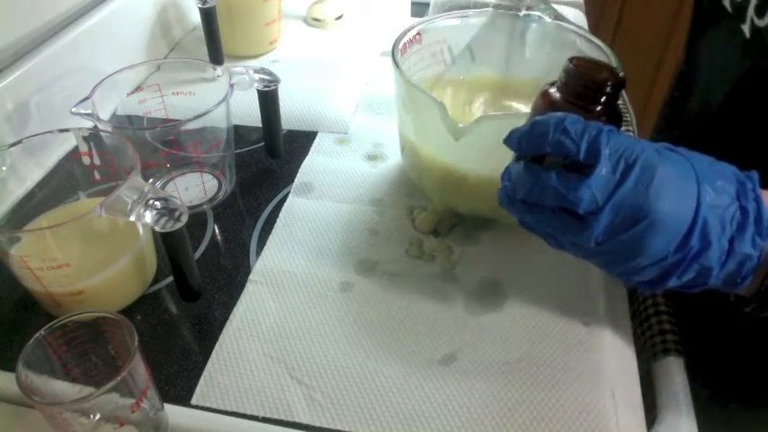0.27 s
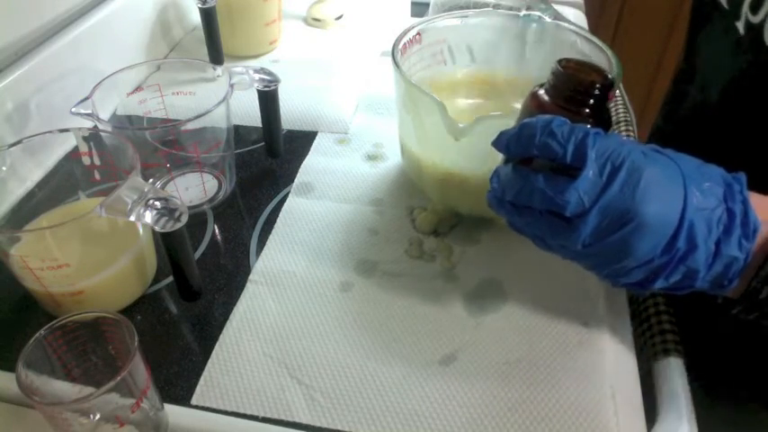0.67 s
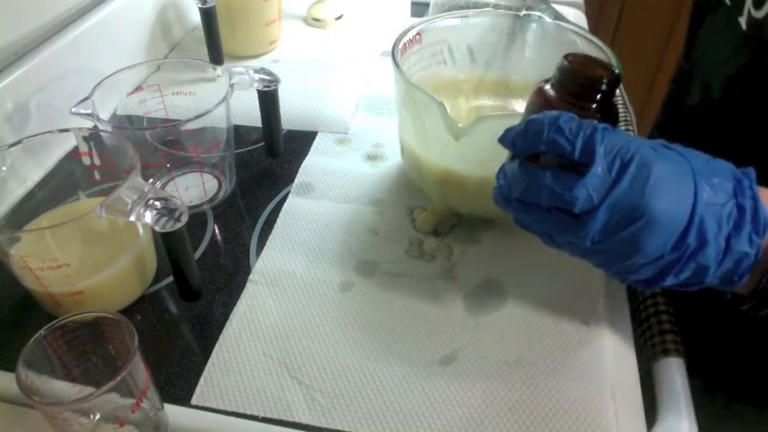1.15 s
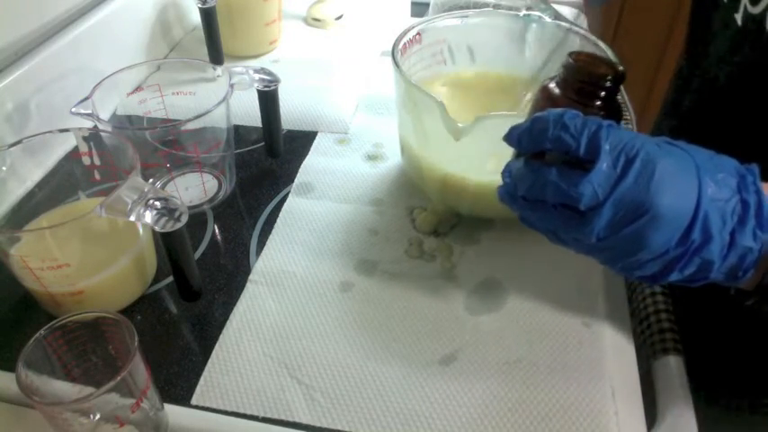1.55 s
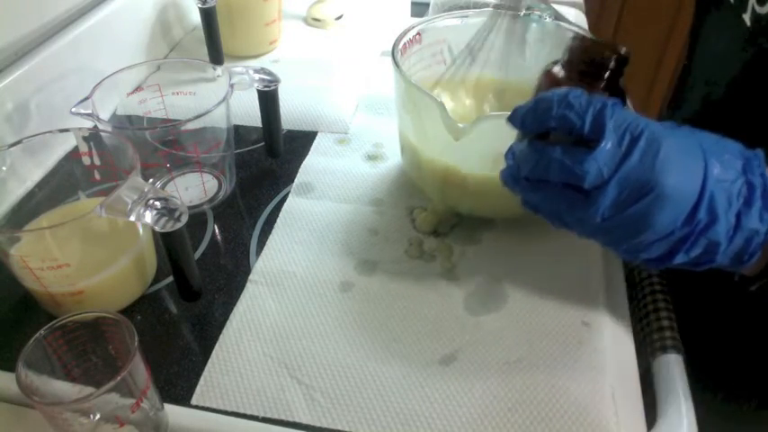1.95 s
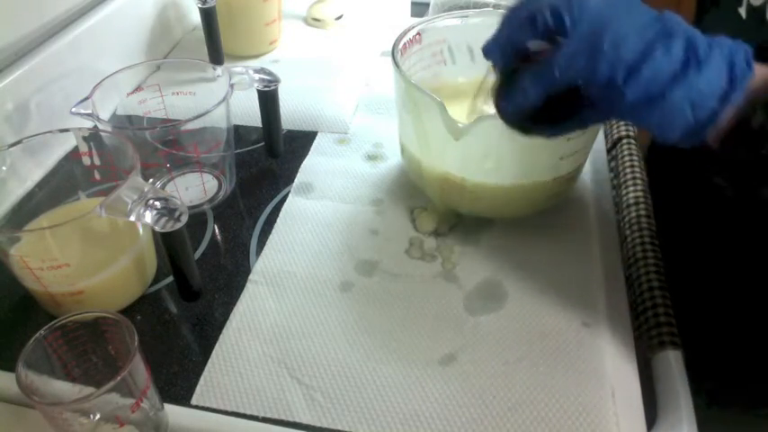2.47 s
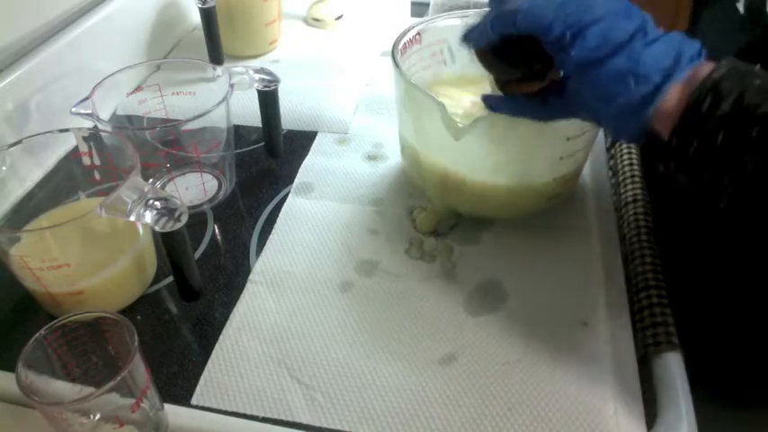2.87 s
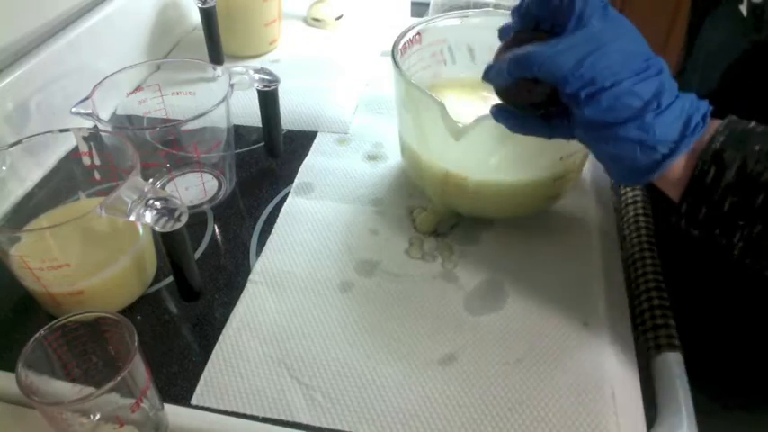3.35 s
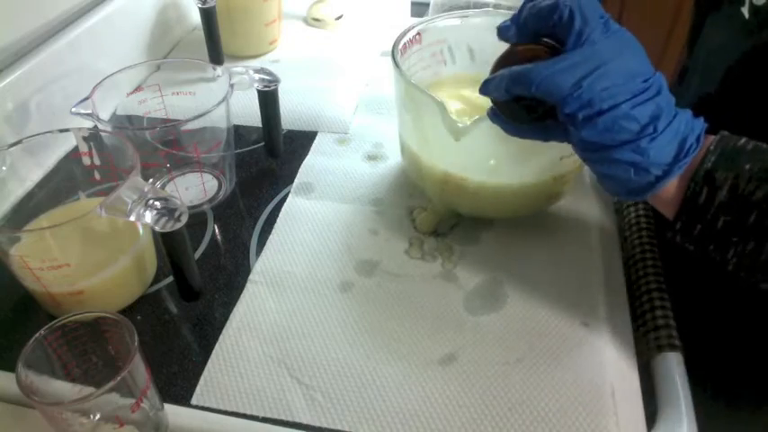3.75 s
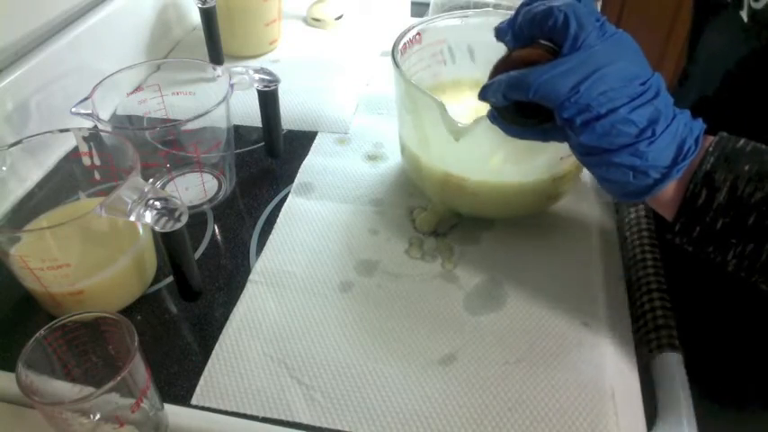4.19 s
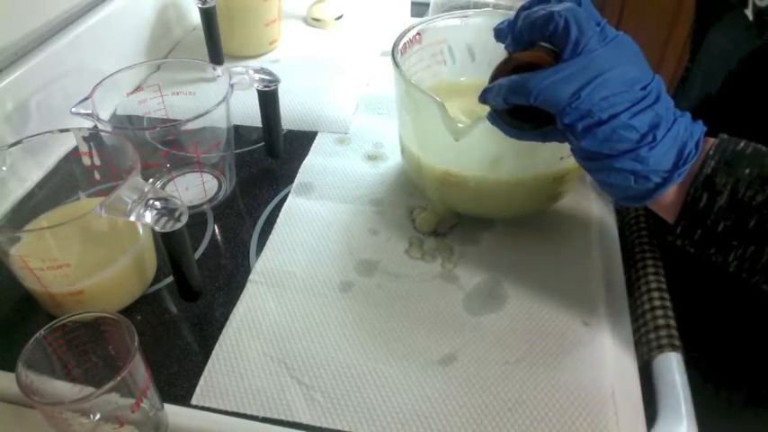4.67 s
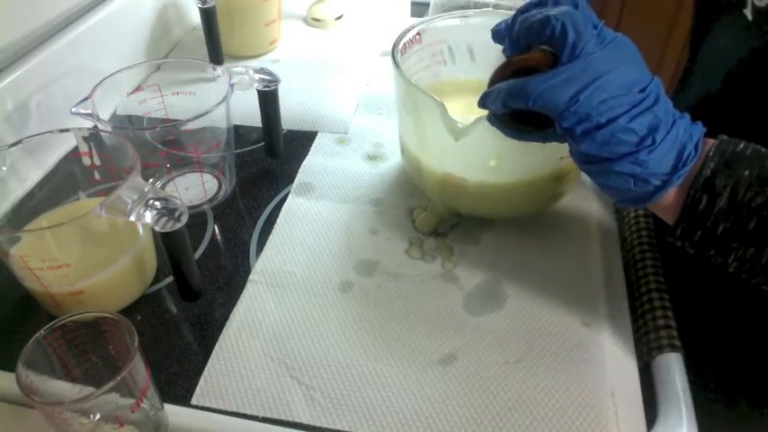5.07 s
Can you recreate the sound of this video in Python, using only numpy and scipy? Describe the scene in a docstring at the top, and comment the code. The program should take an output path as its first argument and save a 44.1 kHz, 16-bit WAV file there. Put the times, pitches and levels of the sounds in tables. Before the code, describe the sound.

Rapid metallic ticking of whisk wires on thick glass, each stroke a tiny burst of dry clicks and short, damped rings. The steady rhythm breaks off at about two and a half seconds; a loud hollow knock follows, then hesitant clinks, then brisk beating to the end. Close and dry, indoors, with short kitchen reflections, low quiet hum and limited deep bass and top treble.

```python
"""Over a faint appliance hum, a wire whisk beats batter in a glass jug on a kitchen counter, close by.
There are about four and a half strokes a second, with a lull near the middle. At each stroke the wires
clatter one after another on the glass: dry ticks plus short damped rings. Now and then the jug is knocked,
and jug and counter ring low as sums of dying sines. A small hard room answers with random echoes,
and a small microphone thins the deep bass and the top."""
import sys
import numpy as np
from scipy import signal
from scipy.fft import rfft, irfft
from scipy.io import wavfile
from scipy.ndimage import uniform_filter1d

SR = 44100
rng = np.random.default_rng(int(sys.argv[2]) if len(sys.argv) > 2 else 0)


def pcm_store(signal):
    """Save signal as 16-bit PCM."""
    levels = np.round(np.clip(np.atleast_2d(signal), -1, 1) * 32767)
    wavfile.write(sys.argv[1], SR, levels.astype(np.int16).T)


def undo_db(level):
    """Turn decibels back into plain size, where 20 dB means ten times bigger."""
    steps = np.asarray(level, float) / 20
    return 10 ** steps


N = 234645  # length in samples


def evened(x):
    """Scales to rms 1."""
    return x / np.sqrt(np.mean(x ** 2) + 1e-20)


def read(points, hz):
    """Reads a spectrum table along straight lines on a log-frequency axis."""
    f, value = np.transpose(points)
    return np.interp(np.log(hz + 1), np.log(f + 1), value)


def add(mix, s, sound):
    """Mixes a sound in at time s in seconds."""
    part = mix[max(round(s * SR), 0):][:len(sound)]
    part += sound[:len(part)]


def causal(db):
    """The shortest impulse with this dB spectrum: its energy comes as early as it can."""
    log_gain = np.log(undo_db(np.maximum(db, -100)))
    full = np.r_[log_gain, log_gain[-2:0:-1]]
    minimum_phase = np.exp(np.conj(signal.hilbert(full)))
    return np.fft.ifft(minimum_phase).real


def ring(modes, spot_db, detune, size):
    """Dying sines; the struck spot weights each mode anew, the moving batter detunes it."""
    hz, db, t60 = np.transpose(modes)[:, :, None]
    t = np.arange(size) / SR
    luck = rng.standard_normal((len(modes), 3))
    cycles = hz * (1 + detune * luck[:, 2:]) * t
    level_db = db + spot_db * luck[:, :1] - 60 * t / np.clip(t60, .005, 2)
    waves = undo_db(level_db) * np.sin(2 * np.pi * cycles)
    build = 1 - np.exp(-cycles / 2.14)  # a mode needs a few cycles to get going
    sign = np.sign(luck[:, 1:2])
    return (sign * build * waves).sum(0)


def patter(length, per_s, spread_db, rise, size):
    """A light first contact, then random ones that swell, hold for the given length and thin out."""
    t = np.arange(size) / SR
    luck = rng.random((size, 3))
    hit = luck[:, 0] < per_s / SR
    hit[0] = True
    sizes = undo_db(-spread_db * np.log(np.maximum(luck[:, 1], .05)))
    signs = np.sign(luck[:, 2] - .5)
    swell = 1 - 0.59 * np.exp(-t / max(rise, 1e-4))
    fade = np.exp(-(t / max(length, .001)) ** 1.94)
    return hit * sizes * signs * swell * fade


def peaked(x, db):
    """Sets the highest short-time rms, over about 3 ms."""
    loudest = np.sqrt(uniform_filter1d(x ** 2, 130).max())
    return x * undo_db(db) / loudest


# Room tone around the counter. Each row: frequency in Hz, relative density in dB per Hz.
ROOM_TONE = [(30, 18), (50, 7), (100, -4), (190, 5), (300, 5), (500, -4), (1000, -1.5), (1700, -16.5),
             (3500, -16.5), (7000, -21), (10000, -36.5), (16000, -48)]
# Steady appliance tones in the background. Each row: frequency in Hz, middle rms level in dB.
APPLIANCE_TONES = [(120.1, -68.5), (144.5, -62.5), (180, -71), (240, -74), (399.3, -70)]
ROOM_TONE_DB = -53.5  # rms


def hum():
    """Shaped noise for the room tone, plus appliance sines wavering slightly in level and phase."""
    hz, t = np.fft.rfftfreq(N, 1 / SR), np.arange(N) / SR
    spectrum = rfft(rng.standard_normal(N)) * undo_db(read(ROOM_TONE, hz))
    out = undo_db(ROOM_TONE_DB) * evened(irfft(spectrum, N))
    for f, db in APPLIANCE_TONES:
        waver = evened(uniform_filter1d(rng.standard_normal(N), size=9000))
        phase = 2 * np.pi * (f * t + rng.random()) + .3 * waver
        out += np.sqrt(2) * undo_db(db + 1.5 * waver) * np.sin(phase)
    return out


# Wires meeting the wall close by, hard forward strokes and lighter returns. Each row: start in seconds,
# peak short-time level in dB, main ring in Hz, treble tint in dB, clatter length in seconds.
WIRE_CONTACTS = [(0.001, -34, 5020, -7, .021), (0.026, -39, 2070, -2, 0.02), (0.084, -21, 3990, -3, 0.025),
                 (0.206, -33.5, 4050, -0.5, 0.03), (0.285, -42, 2040, -17, 0.0064),
                 (0.292, -22, 7170, -6, .027), (0.419, -44, 6900, 4, 0.0083), (0.428, -35, 2140, -3, 0.016),
                 (0.471, -41.5, 4570, -5, 0.009), (0.517, -26, 4270, 1, .02),
                 (0.642, -35, 6980, 1.5, 0.025), (0.658, -36, 2370, -6, .012),
                 (0.747, -19, 4170, -1.5, .024), (0.868, -41, 6900, 1, 0.025),
                 (0.892, -34.5, 4880, 2, .013), (0.976, -25, 7080, -2, 0.026),
                 (1.108, -39, 7120, 1, 0.0063), (1.122, -35.5, 6800, -3, 0.016),
                 (1.171, -46.5, 6960, -8, .014), (1.214, -21.5, 6970, -2, 0.026),
                 (1.352, -38.5, 4840, -1, 0.032), (1.407, -45.5, 4400, 0, .025),
                 (1.444, -29.5, 7160, -10, 0.0031), (1.45, -18, 7080, -3, 0.023),
                 (1.589, -42, 7200, 3, 0.018), (1.638, -33, 4340, -2, 0.015),
                 (1.669, -28.5, 4270, -4, 0.014), (1.683, -33, 2620, -4, 0.019),
                 (1.831, -41, 2060, 2, 0.021), (1.867, -42.5, 4300, -19, 0.0029),
                 (1.89, -46, 4300, 10, 0.023), (1.912, -20.5, 4270, -1, 0.018),
                 (1.939, -33, 2650, -1, 0.033), (2.059, -35, 6860, -2.5, 0.029),
                 (2.095, -34.5, 2410, -2.5, 0.023), (2.158, -32, 3420, 0, 0.0085),
                 (2.177, -24.5, 1700, -1, 0.032), (2.285, -39.5, 7400, 7, .003), (2.3, -38, 3130, -5, .028),
                 (2.379, -51, 2020, 9, 0.033), (2.405, -24, 2620, -1, .026), (2.539, -49, 7100, -2, 0.018),
                 (2.923, -47, 4830, -18, .009), (2.951, -36, 2720, -20.5, .014),
                 (2.985, -32.5, 3730, -11.5, 0.026), (3.095, -54, 2700, -3.5, .03),
                 (3.145, -42, 3200, -28, 0.0133), (3.17, -46.5, 5000, -12, 0.026),
                 (3.186, -39.5, 4650, 4, 0.029), (3.238, -28.5, 3240, -23, 0.0056),
                 (3.279, -33, 2520, -1, 0.0075), (3.307, -38.5, 5700, -1, 0.017),
                 (3.341, -43, 2560, -14, .021), (3.372, -15.5, 1690, -27.5, 0.0097),
                 (3.431, -37.5, 1850, -1.5, 0.032), (3.52, -45, 6300, -6, .013),
                 (3.534, -30, 6420, -6.5, 0.014), (3.577, -31, 2410, 0, 0.017),
                 (3.64, -37, 2180, -1, 0.026), (3.664, -34.5, 7100, 0, 0.021), (3.722, -29, 2620, -2, .027),
                 (3.764, -18, 5200, -1, .013), (3.836, -34.5, 2340, -5, .012), (3.851, -35, 2470, -4, .025),
                 (3.93, -33, 2580, -4, .023), (3.972, -19.5, 4400, -2, 0.015),
                 (4.045, -35, 3480, -8, 0.035), (4.097, -40.5, 4670, -15, .014),
                 (4.14, -35.5, 2600, -8, 0.03), (4.189, -19.5, 2244, 1, .016),
                 (4.267, -27.5, 4070, -9, .023), (4.292, -28.5, 2470, 4, 0.011),
                 (4.306, -25.5, 6950, -3, 0.0042), (4.363, -36, 2700, -2, 0.015),
                 (4.4, -17, 2440, -1.5, 0.015), (4.485, -32.5, 3830, -8, 0.017),
                 (4.572, -34.5, 2650, -2, .022), (4.605, -19, 5120, -3.5, 0.017),
                 (4.69, -38, 2620, -7, 0.025), (4.722, -23, 2570, -1.5, .014),
                 (4.783, -33.5, 2590, -3, 0.014), (4.82, -16.5, 4310, -2.5, .019),
                 (4.907, -34, 3390, -11, 0.015), (4.925, -18.5, 3730, -4, 0.013),
                 (4.992, -35.5, 2760, -12, 0.012), (5.028, -16, 5840, -3, 0.017),
                 (5.125, -27.5, 5700, -1.5, 0.019), (5.229, -15.5, 4010, -0.5, .019)]
# Batter-damped glass wall. Each row: mode in Hz, level in dB, t60 in seconds, both before the
# stroke tilts the levels and caps the longest rings.
GLASS_WALL = [(1465, -12, 0.051), (1742, 1, 0.013), (2180, -5, 0.027), (2470, 0, 0.027), (2712, -1, 0.027),
              (3093, -6, 0.029), (3500, -11, 0.12), (3763, 3, 0.012), (4240, 7, 0.0073), (4270, 4, 0.028),
              (4670, -3, 0.0074), (4982, -5, 0.043), (5200, -25, 0.097), (5600, -13, 0.15),
              (6130, 3.5, 0.016), (6870, 11.5, 0.0061), (7120, 5, 0.0097), (7420, 3, 0.013),
              (8150, -17.5, 0.018), (8640, -5.5, 0.016), (9330, -3, 0.0092), (9960, -16, 0.012),
              (11700, -21, 0.019)]
# Bare wire contact without the glass. Each row: frequency in Hz, relative density in dB per Hz.
WIRE_TICK = [(180, -11), (300, -71), (532, 4), (1100, -5.5), (1370, -9.5), (2470, 8.5), (3020, 0),
             (4300, -3.5), (4760, 4), (7250, -3), (14200, -9.5), (15700, -13.5), (16800, -146)]
# level at 2100 Hz against 4300 Hz; a stroke that rings lower carries more of it
LOW_DB, LOW_DB_PER_OCTAVE = -2.5, 1.5


def strokes():
    """Each stroke is a burst of wire contacts at several spots: a bare tick plus the ring of the glass."""
    out, hz = np.zeros(N), np.fft.rfftfreq(4096, 1 / SR)
    tick = evened(causal(read(WIRE_TICK, hz))[:2048])
    for s, db, note_hz, high_db, length in WIRE_CONTACTS + grazes():
        low_db = LOW_DB + LOW_DB_PER_OCTAVE * np.log2(4300 / note_hz)
        # light strokes: few separate clinks; hard ones: a dense crash
        force = np.clip((db + 45.5) / 25, 0, 1)
        clatter = 0
        for late in np.linspace(0, 1, num=6):
            # thin wire tips land first and ring high, the thick loops follow and ring low
            tilt_db = 7.5 * (.5 - late)  # per octave
            wall = [(f, level + tilt_db * np.log2(f / 4300), min(t60, .07)) for f, level, t60 in GLASS_WALL]
            glass = evened(ring(wall, 10.5 - 5 * force, 0.026, size=2048))
            train = patter(length, 70 + 430 * force ** 1.5, 3.1, 0.00063, size=4096)
            train = np.roll(train, round(.25 * late * length * SR))
            contact = glass + undo_db(-10.5 + 7.25 * force) * tick
            clatter = clatter + signal.oaconvolve(train, contact)
        # the loosened wires go on shivering against each other
        shiver = patter(99, 1500, 1.7, length, size=4096)
        shiver *= undo_db(-60 * np.arange(4096) / SR / 0.13)
        clatter = evened(clatter) + undo_db(-15) * evened(signal.oaconvolve(shiver, tick))
        # batter between wire and wall dulls or brightens the stroke
        tint = causal(read([(2100, low_db), (4300, 0), (8500, high_db)], hz))[:512]
        clatter = signal.oaconvolve(clatter, tint)[:6000]
        note = ring([(note_hz, 0, .021)], 0, 0, size=2048)
        note = signal.oaconvolve(patter(length, 300, 1.0, 0.0029, size=4096), note)[:6000]
        stroke = evened(clatter) + undo_db(-3.0 - 4.6 * force) * evened(note)
        add(out, s, peaked(stroke, db))
    return out


# Decay of the small hard room. Each row: frequency in Hz, t60 in seconds.
ROOM_DECAY = [(150, 0.26), (600, 0.54), (2000, 0.31), (5000, 0.23), (9000, 0.18), (15000, 0.15)]


def room(x):
    """Sparse taps of random sign, each band dying at its own speed; the moving whisk keeps changing the paths."""
    at = np.arange(120, SR // 2 - 20, 20)
    out = np.zeros(N)
    turn = 2 * np.pi * 2.7 * np.arange(N) / SR  # the paths turn at 2.7 Hz
    for k in range(3):
        taps = np.zeros(SR // 2)
        taps[at + rng.integers(0, 20, len(at))] = rng.choice([-1., 1.], len(at))
        hz, t, bands = signal.stft(taps, SR, nperseg=256)
        decay = undo_db(-60 * t / read(ROOM_DECAY, hz)[:, None])
        tail = signal.istft(bands * decay, SR, nperseg=256)[1]
        share = np.sqrt(2 / 3) * np.cos(turn + k * np.pi / 3)  # the three powers sum to 1
        out += signal.fftconvolve(x * share, tail / np.linalg.norm(tail))[:N]
    return out


HARD_DB = -27.2  # strokes above this peak count as hard
# stray wires touching lightly: level and its spread either way, clatter length in seconds
GRAZE_DB, GRAZE_SPREAD_DB, GRAZE_S = -45.5, 3, .016
# they run ahead of some hard strokes and lag behind some lighter ones, by seconds from least to most
LEAD_S, TRAIL_S = (0.011, .035), (0.043, .07)
LEAD_SHARE, TRAIL_SHARE = .7, .3  # chance of a graze


def grazes():
    """Faint stray contacts around the strokes, each on a wall mode of its own."""
    rows = []
    luck = rng.random((len(WIRE_CONTACTS), 5))
    for (s, db, *_), (keep, when, size, spot, tone) in zip(WIRE_CONTACTS, luck):
        hard = db > HARD_DB
        (first, last), side = (LEAD_S, -1) if hard else (TRAIL_S, 1)
        if keep < (LEAD_SHARE if hard else TRAIL_SHARE):
            start = s + side * (first + when * (last - first))
            level = min(GRAZE_DB + GRAZE_SPREAD_DB * (2 * size - 1), db - 8)
            note_hz = GLASS_WALL[int(2 + 16 * spot)][0]
            rows.append((start, level, note_hz, 3 - 10 * tone, GRAZE_S))
    return rows


# every hard stroke also shakes the jug a little: peak against the stroke's, range of notes, hardness, t60 in s
SHAKE_DB, SHAKE_HZ, SHAKE_HARD_DB, SHAKE_T60 = -27, (520, 915), -1, 0.2


def shakes():
    """The jug's low answer to each hard stroke, 2 ms behind it, more often on a lower note."""
    rows = []
    low_hz, high_hz = SHAKE_HZ
    for (s, db, *_), u in zip(WIRE_CONTACTS, rng.random(len(WIRE_CONTACTS))):
        if db > HARD_DB:
            note_hz = low_hz * (high_hz / low_hz) ** u ** 2
            rows.append((s + 0.002036, db + SHAKE_DB, note_hz, SHAKE_HARD_DB, SHAKE_T60))
    return rows


# Knocks of the jug close by, many of them together with a stroke. Each row: start in seconds,
# peak short-time level in dB, main note in Hz, hardness in dB, t60 of that note in seconds.
JUG_KNOCKS = [(0.098, -34, 535, -24, .16), (0.318, -42.5, 770, -6, 0.15), (0.645, -38, 706, -15.5, 0.07),
              (0.768, -33, 523.6, -20, 0.13), (0.869, -48.5, 764, -5, 0.17), (1.214, -36, 920, -7.5, .06),
              (1.452, -30.5, 774, -3, 0.036), (1.913, -39.5, 520, -28, 0.13), (2.121, -42.5, 642, -6, 0.17),
              (2.778, -19, 2120, 1, 0.034), (2.78, -14, 654, -12, 0.045), (2.788, -37, 640, 3, 0.036),
              (3.281, -26, 520, -25.5, 0.034), (3.373, -24, 1257, -18, 0.03), (3.459, -37.5, 536, -5, 0.03),
              (3.668, -35, 561, -31, 0.17), (3.766, -35, 546, -6.5, 0.036), (4.192, -41, 576, -18, 0.16),
              (4.3, -45.5, 683, -7, 0.071), (4.924, -30.5, 698, -14.5, 0.037),
              (5.125, -33, 674, -18, 0.016)]
# Jug and counter. Each row: mode in Hz, level in dB before the hardness, t60 in seconds before the hold.
JUG_AND_COUNTER = [(131.4, -3, 0.19), (253.2, 1, 0.16), (334.4, -5, 0.13), (402, -14, 0.1),
                   (480, -9, 0.031), (524.8, -9, 0.24), (561, -5.5, 0.18), (627, -10.5, 0.053),
                   (689, -2, 0.12), (774, -5.5, 0.2), (828, -11, 0.24), (1008, -5.5, 0.1),
                   (1329, -5.5, 0.15), (1580, -19, 0.037), (1704, -5, 0.055), (2180, -6, 0.021),
                   (2840, -3.5, 0.04), (4340, -35.5, 0.08), (5700, -24, 0.52), (5750, -15.5, 0.059),
                   (5825, -13, 0.19), (8070, -11.5, .08)]
# Crack of a knock. Each row: frequency in Hz, relative density in dB per Hz.
KNOCK_CRACK = [(150, -24), (300, -13), (670, -11), (1050, -17), (2300, -13.5), (3300, -26), (6000, -26),
               (9000, -46), (16000, -65)]


def knocks():
    """A soft blow sounds mostly one low note; a hard one wakes all modes and cracks."""
    out, hz = np.zeros(N), np.fft.rfftfreq(2048, 1 / SR)
    crack = causal(read(KNOCK_CRACK, hz))[:1024]
    for s, db, note_hz, hard_db, note_t60 in JUG_KNOCKS + shakes():
        held = np.sqrt(note_t60 / 0.1)  # every mode rings longer or shorter with the note's t60 against 0.1 s: a jug held or pressed down rings shorter, a freer one longer
        modes = [(note_hz, 1.5, note_t60)]
        for f, level, t60 in JUG_AND_COUNTER:
            wake_db = hard_db * (.4 if 400 < f < 1000 else 1)
            modes.append((f, level + wake_db, held * t60))
        body = ring(modes, 1.0, 0.0088, size=12000)
        add(body, 0, undo_db(10.5 + hard_db) * crack / abs(crack).max())
        # the counter top rumbles on in modes too dense to count
        rumble = rng.standard_normal(12000) * undo_db(-60 * np.arange(12000) / SR / 0.1)
        rumble = evened(signal.oaconvolve(rumble, crack)[:12000])
        add(body, 0, undo_db(-15.0 + 1.2 * hard_db) * rumble)
        add(out, s, peaked(body, db))
    return out


def scene():
    """Whisk and jug in the room, over the hum."""
    background = hum()
    jug = strokes() + knocks()
    return (jug + undo_db(-11.5) * room(jug) + background)[None]


def roll_off(x):
    """The treble ends steeply here."""
    return signal.sosfilt(signal.butter(12, 16990, fs=SR, output="sos"), x)


def record(dry):
    """A small microphone that misses the deep bass and the top."""
    bass_cut = signal.butter(4, 75, "high", fs=SR, output="sos")
    thin = signal.sosfilt(bass_cut, dry)
    top_cut = signal.firwin(255, 16700, fs=SR)
    thin = signal.oaconvolve(thin, top_cut[None], "same")
    return roll_off(thin)


dry = scene()
out = record(dry)
pcm_store(out)
```